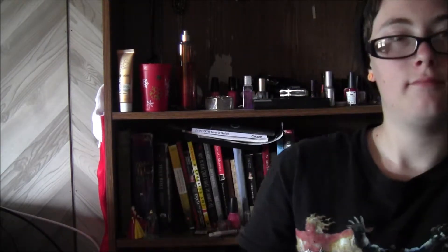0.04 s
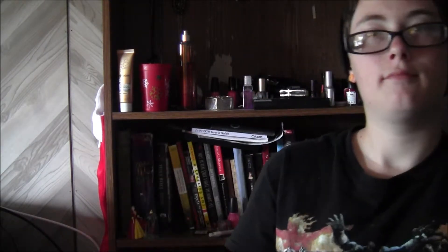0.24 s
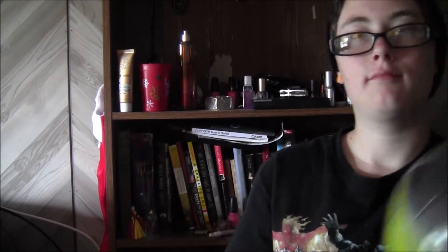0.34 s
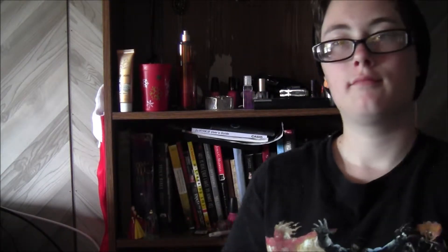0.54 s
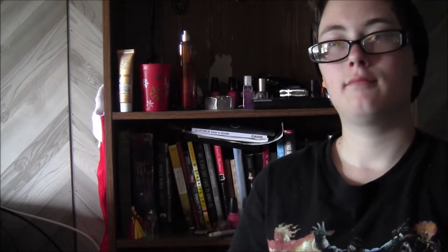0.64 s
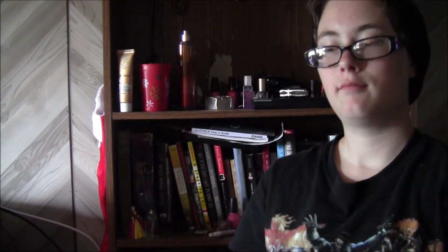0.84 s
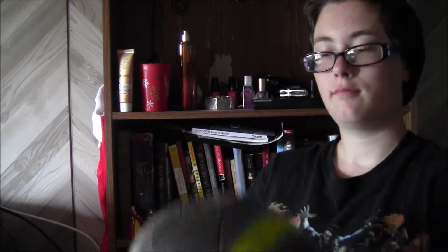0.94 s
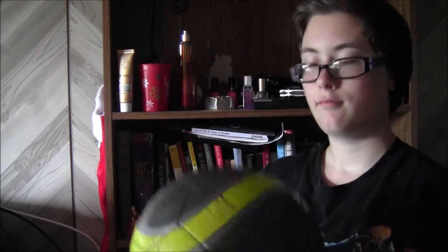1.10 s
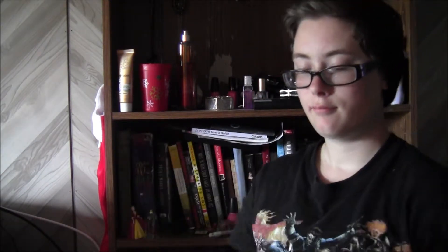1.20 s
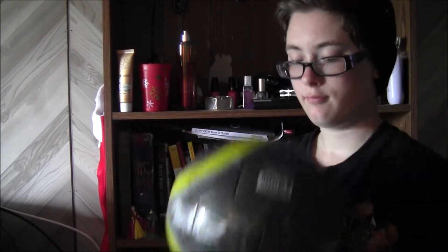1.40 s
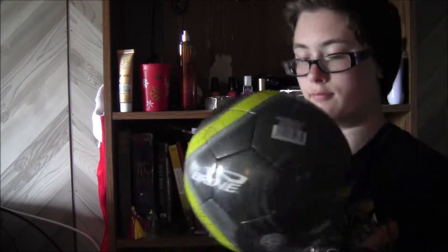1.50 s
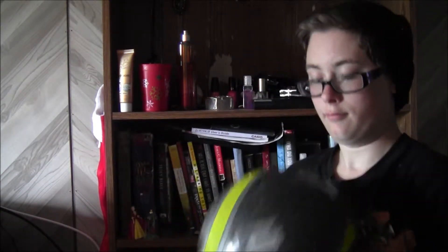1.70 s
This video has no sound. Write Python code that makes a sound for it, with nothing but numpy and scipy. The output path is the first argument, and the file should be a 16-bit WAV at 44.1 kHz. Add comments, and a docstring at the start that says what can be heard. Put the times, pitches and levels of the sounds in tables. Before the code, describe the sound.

Hollow thuds of a football being tossed and caught by hand, with faint rubbing between.

```python
"""Football tossed and caught in a small bedroom

Each blow of the hands squashes the ball (thump), knocks its casing, rings the air inside and slaps
the skin; shelves and walls answer briefly. Between blows, fingers nudge, creak and tick on the
skin, the ball brushes over a shirt and a small hard object clinks, all close by over quiet room tone."""
import sys
import numpy as np
from scipy import signal
from scipy.fft import rfft, irfft, next_fast_len
from scipy.io import wavfile
from scipy.ndimage import uniform_filter1d

SR = 44100
rng = np.random.default_rng(int(sys.argv[2]) if len(sys.argv) > 2 else 0)


def generate_wav(signal):
    """Clip the signal to [-1, 1] and save it as 16-bit WAV at the path in sys.argv[1]."""
    frames = np.transpose(np.atleast_2d(signal))
    scaled = np.clip(frames, -1, 1) * 32767
    pcm = np.round(scaled).astype(np.int16)
    wavfile.write(sys.argv[1], SR, pcm)


N = 77175
T = np.arange(N) / SR
NFFT = 2 * next_fast_len(3 * N // 4)
FREQ_HZ = np.maximum(np.arange(NFFT // 2 + 1) * SR / NFFT, 1)
SIDES = np.array([[1], [-1]])  # left, right


def undb(db):
    """Decibels to gain."""
    return 10 ** (np.asarray(db) / 20)


def at_rms(x, db):
    """Scale to an rms level."""
    return x * undb(db) / np.sqrt(np.mean(x ** 2))


def curve(points, hz=FREQ_HZ):
    """Interpolate (f/Hz, value) points over log frequency."""
    knots_hz, values = np.array(points).T
    return np.interp(np.log(hz), np.log(knots_hz), values)


def filtered(x, response):
    """Apply a frequency response."""
    return irfft(rfft(x, NFFT) * response, NFFT)[..., :N]


def struck(spectrum, stretch=1):
    """Minimum-phase response from (f/Hz, level/dB) points, stretched in pitch."""
    cepstrum = irfft(np.log(undb(curve(spectrum, FREQ_HZ / stretch))), NFFT)
    half = NFFT // 2
    return np.exp(rfft(np.r_[cepstrum[0], 2 * cepstrum[1:half], np.zeros(half)]))


def resonant(modes):
    """Frequency response of decaying modes."""
    return sum(undb(db) / (1 + 1j * np.pi * t60_s / np.log(1000) * (FREQ_HZ - hz ** 2 / FREQ_HZ))
               for hz, db, t60_s in modes)


def pulses(times_s, levels_db):
    """One impulse at each time."""
    samples = np.round(np.asarray(times_s) * SR).astype(int)
    return np.bincount(samples, undb(levels_db), N)


# spectra of the four parts of a blow: f/Hz, level/dB
THUMP_SPECTRUM = [(25, -15), (60, -7.5), (110, 6), (160, 6), (280, 3), (420, -19), (1000, -84.5),
                  (4000, -67)]
KNOCK_SPECTRUM = [(70, -30), (150, -19.5), (210, 3), (330, 5.5), (460, 1), (650, 0), (1000, -31.5),
                  (2500, -21.5), (9000, -76)]
RING_SPECTRUM = [(150, -42), (620, -31.5), (850, -3), (1200, 2), (1550, -5), (2000, -10), (2450, -13.5),
                 (5000, -27.5), (15000, -102)]
SLAP_SPECTRUM = [(300, -30.5), (2400, -3), (3300, 0), (4200, -1), (5200, -5), (6500, -6), (8500, -9),
                 (11000, -17.5), (13500, -29.5), (15200, -42)]
KNOCK_PEAK_HZ, RING_PEAK_HZ = 330, 1200
# blows: t/s, thump/dB, knock/dB, knock/Hz, ring/dB, ring/Hz, slap/dB, crackle/dB, pan L-R/dB
BLOWS = [(0.2143, 6.5, 15, 340, 24.5, 1000, -14, 9.5, -2), (0.2197, -16, 23, 368, 26, 866, 6, -13, 1.5),
         (0.4816, 4.5, -2.5, 655, 6, 908, -39, -17, -1.5),
         (0.4954, 0.5, -0.5, 313, -0.5, 1040, -19, -15.5, 0),
         (0.5662, 4, 15.5, 241, 11, 1190, 1.5, -40, 0.5), (1.4556, 17, 12, 287, 25.5, 1184, 12.5, 2, -0.5)]


def blows():
    """Hands squash the ball, knock its casing, ring the air inside and slap the skin."""
    out = np.zeros((2, N))
    thump, slap = struck(THUMP_SPECTRUM), struck(SLAP_SPECTRUM)
    for start_s, thump_db, knock_db, knock_hz, ring_db, ring_hz, slap_db, crackle_db, pan_db in BLOWS:
        knock = undb(knock_db) * struck(KNOCK_SPECTRUM, knock_hz / KNOCK_PEAK_HZ)
        ring = undb(ring_db) * struck(RING_SPECTRUM, ring_hz / RING_PEAK_HZ)
        response = undb(thump_db) * thump + knock + ring + undb(slap_db) * slap
        impact = filtered(pulses([start_s], [0]), response)
        settling = undb(crackle_db) * filtered(crackle(start_s), slap)
        out += (impact + settling) * undb(SIDES * pan_db / 2)
    return out


def crackle(start_s, settle_s=0.0066):
    """Unit-energy burst of tiny contacts as skin and fingers settle after first touch."""
    age_s = np.maximum(T - start_s, 0)
    envelope = (age_s > 0) * np.exp(-np.minimum(age_s / settle_s, 10) ** 2)
    burst = rng.standard_normal(N) * envelope
    return burst / np.sqrt(np.sum(burst ** 2))


# ball and room modes: f/Hz, peak/dB, t60/s
LASTING_MODES = [(69.5, 6.5, 0.46), (111, -6, 0.17), (131, 6.5, 0.31), (151.7, -3, 0.21),
                 (185.2, 0.5, 0.24), (264.2, 2, 0.26), (362, -1.5, 0.12), (513, -3, .13), (633, 9, 0.21),
                 (671.3, 5.5, 0.098), (784, 9, 0.13), (807, 3.5, 0.33), (946, 5, .17), (1158, -16, 0.23),
                 (1296, -11, 0.25), (1460, -0.5, 0.19), (1550, -18, 0.27), (1921, 8, 0.05),
                 (3004, -5, 0.29), (3200, -6, 0.079)]


def ringing(hits):
    """Ball and room resonate on after each blow."""
    return filtered(hits, resonant(LASTING_MODES))


# soft nudges of the ball: t/s, level/dB, f/Hz
NUDGES = [(0.153, -15, 262), (0.157, 0, 170), (0.172, -7.5, 234), (0.185, -5, 236), (1.136, -4.5, 65)]


def nudges():
    """Dull, weak knocks as the grip shifts."""
    return sum(filtered(pulses([start_s], [db]), struck(KNOCK_SPECTRUM, hz / KNOCK_PEAK_HZ))
               for start_s, db, hz in NUDGES)


# spectrum of one slip: f/Hz, level/dB
CREAK_SPECTRUM = [(100, -30), (450, -4.5), (800, -0.5), (1200, -1), (1900, -5.5), (2800, -21.5),
                  (8000, -27.5), (15000, -45)]
# damped casing modes: f/Hz, peak/dB, t60/s
CREAK_MODES = [(970, -17, 0.022), (1225, -4, 0.11), (1890, -4, 0.03)]
# finger slips: t/s, level/dB
SLIPS = [(0.707, -23), (0.722, -21), (0.727, -18.5), (0.735, -17), (0.742, -15), (0.766, -16), (0.774, -20),
         (0.782, -12), (0.789, -12.5), (0.801, -17), (1.024, -9), (1.04, -19), (1.043, -11), (1.047, -22),
         (1.064, -9.5), (1.074, -11.5), (1.096, -15)]


def creaks():
    """Each slip of a finger knocks the hand-damped casing."""
    casing = struck(CREAK_SPECTRUM) * (1 + resonant(CREAK_MODES))
    return filtered(pulses(*np.array(SLIPS).T), casing)


# spectrum of a light contact: f/Hz, level/dB
TICK_SPECTRUM = [(200, -5), (700, -0.5), (1800, -2.5), (3700, 0.5), (5500, -6.5), (8000, -7), (11000, -23),
                 (15000, -39)]
# fingertip touches: t/s, level/dB
TICKS = [(0.0955, -24.5), (0.1227, -22), (0.1519, -18), (0.1690, -12.5), (0.1873, -16), (0.2840, -11),
         (0.5370, -19), (1.1710, -19.5), (1.1800, -44), (1.278, -20)]


def ticks():
    """Fingertips tap the skin, small and bright."""
    return filtered(pulses(*np.array(TICKS).T), struck(TICK_SPECTRUM))


# modes common to both clinks: f/Hz, peak/dB, t60/s
CLINK_MODES = [(2890, 1, 0.13), (7700, 14, 0.061)]
# clinks: t/s, level/dB, main ring/Hz, ring peak/dB
CLINKS = [(1.1885, -21, 3700, 27), (1.2827, -12.5, 3924, 6)]


def clinks(ring_t60_s=0.064):
    """A small hard object is struck lightly and rings briefly."""
    out = np.zeros(N)
    contact = struck(TICK_SPECTRUM)
    for start_s, db, ring_hz, ring_db in CLINKS:
        ring = resonant(CLINK_MODES + [(ring_hz, ring_db, ring_t60_s)])
        out += filtered(pulses([start_s], [db]), contact * (1.5 + ring))
    return out


# strokes, Gaussian in time and pitch: t/s, sigma/s, f/Hz, sigma/octaves, level/dB
BRUSHES = [(0.2, 0.075, 3704, .9, -57.5), (0.554, 0.042, 2315, 2.5, -51), (0.864, 0.066, 7000, 0.64, -61),
           (0.943, 0.036, 1960, 0.7, -52.5), (0.952, 0.16, 680, 1.32, -57.5),
           (1.183, 0.048, 2400, 1.45, -56), (1.27, 0.061, 2778, 1.3, -55.5),
           (1.225, 0.047, 540, 0.23, -57.5)]


def brushes(grain_db=3):
    """Grainy friction of the ball on shirt and palms swells and fades with each stroke."""
    out = np.zeros(N)
    for middle_s, sigma_s, hz, sigma_oct, db in BRUSHES:
        roughness = at_rms(uniform_filter1d(rng.standard_normal(N), size=90), 0)
        friction = rng.standard_normal(N) * undb(grain_db * roughness)
        pink_band = np.exp(-.5 * (np.log2(FREQ_HZ / hz) / sigma_oct) ** 2) / np.sqrt(FREQ_HZ)
        swell = np.exp(-.5 * ((T - middle_s) / sigma_s) ** 2)
        out += at_rms(filtered(friction, pink_band), db) * swell
    return out


def reverb_envelope(t60_s, build_s=0.0057):
    """Unit-energy envelope of reflections building up and dying away."""
    envelope = np.exp(-np.log(1000) * T / t60_s) * (1 - np.exp(-T / build_s))
    return at_rms(envelope, 0) / np.sqrt(N)


# echoes off nearby surfaces: delay/ms, level/dB
ECHOES = [(3.1, -12), (6.9, -29)]
# wall reverberation: f/Hz, level/dB re direct, t60/s
WALL_BANDS = [(70, 2, .35), (139, -12.5, 0.26), (270, -3.5, 0.17), (540, -3.5, 0.2), (1180, -4, 0.21),
              (2700, -2, 0.25), (5060, -7.5, 0.25), (11000, -6, 0.2)]
SHELF_DB, SHELF_T60_S, SHELF_HIGHPASS_HZ = -6.5, 0.014, 465
ECHO_LOWPASS_HZ = 1390
WIDTH_DB, WIDTH_REF_HZ = -6, 7500


def room(x):
    """Two near echoes, a quick scatter from the shelves and a short tail from the walls."""
    bands_hz, levels_db, t60s_s = np.array(WALL_BANDS).T
    wall_noise = rng.standard_normal((2, N))
    scatter = rng.standard_normal((2, N)) * reverb_envelope(SHELF_T60_S)
    tail = filtered(scatter, undb(SHELF_DB) / (1 + SHELF_HIGHPASS_HZ / (1j * FREQ_HZ)))
    for weights, db, t60_s in zip(np.eye(len(bands_hz)), levels_db, t60s_s):
        band = filtered(wall_noise, curve(np.c_[bands_hz, weights]))
        tail += band * reverb_envelope(t60_s) * undb(db)
    mid, side = rfft(tail, NFFT)
    echoes = sum(undb(db) * np.exp(-2j * np.pi * FREQ_HZ * ms / 1000) for ms, db in ECHOES)
    echoes /= 1 + 1j * FREQ_HZ / ECHO_LOWPASS_HZ
    width = undb(WIDTH_DB) * np.sqrt(FREQ_HZ / WIDTH_REF_HZ)  # ears differ more as pitch rises
    return filtered(x, 1 + echoes + mid + SIDES * side * width)


# room tone spectrum: f/Hz, relative level/dB
TONE_SPECTRUM = [(25, -8), (70, -4.5), (130, -9), (300, -10.5), (800, -14), (2200, -19.5),
                 (6000, -29), (11000, -34.5), (15000, -50)]


def room_tone(rms_db=-53.5, bass_side_db=-1, hiss_side_db=-3):
    """Steady, wide background noise, strongest in the bass."""
    mid, side = filtered(rng.standard_normal((2, N)), undb(curve(TONE_SPECTRUM)))
    width = undb(curve([(300, bass_side_db), (6000, hiss_side_db)]))
    return at_rms(mid + SIDES * filtered(side, width), rms_db)


def scene():
    """Ball and hands in the room."""
    hits = blows()
    direct = hits + nudges() + creaks() + ticks() + clinks() + brushes()
    return room(direct) + ringing(hits) + room_tone()


def record(dry, lowpass_hz=15200):
    """Clip at full scale, then cut the top."""
    lowpass = signal.ellip(8, .2, 80, lowpass_hz, fs=SR, output="sos")
    return signal.sosfilt(lowpass, np.clip(dry, -1, 1))


dry = scene()
out = record(dry)
generate_wav(out)
```